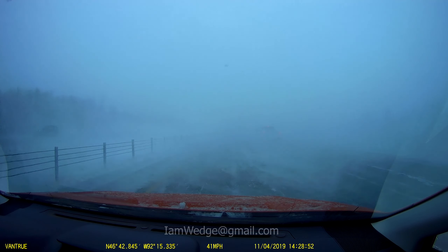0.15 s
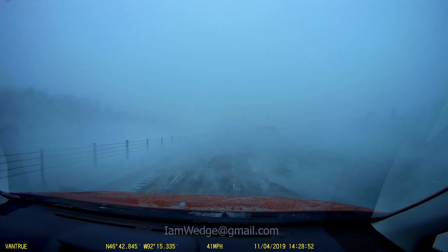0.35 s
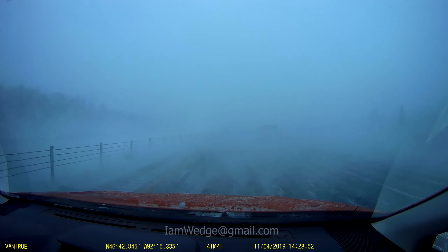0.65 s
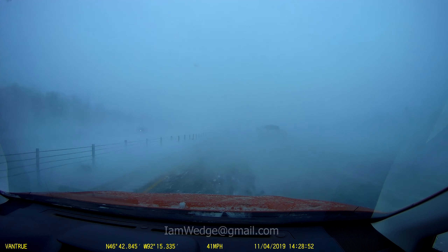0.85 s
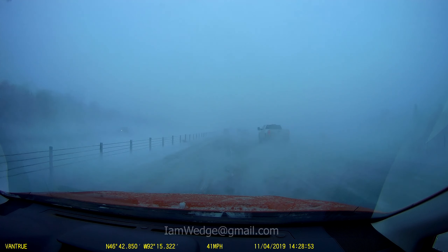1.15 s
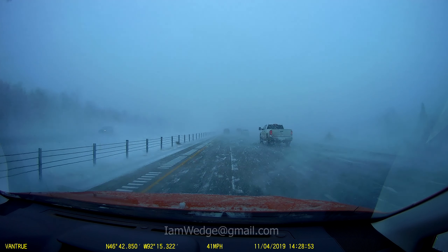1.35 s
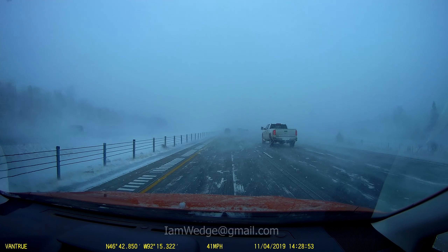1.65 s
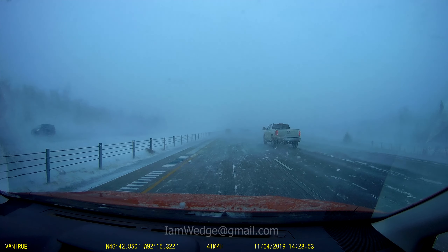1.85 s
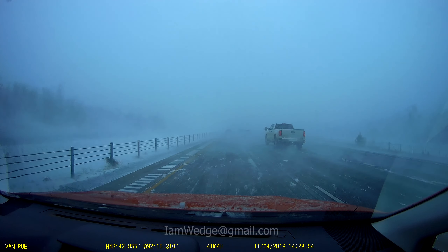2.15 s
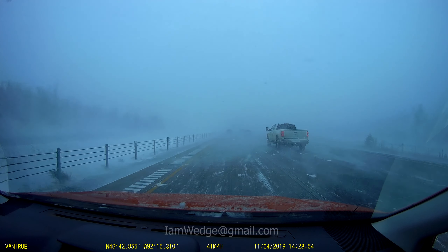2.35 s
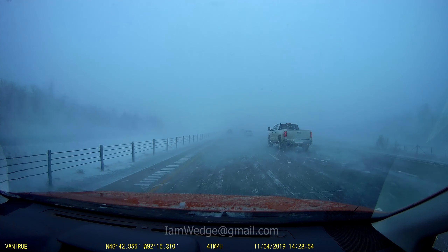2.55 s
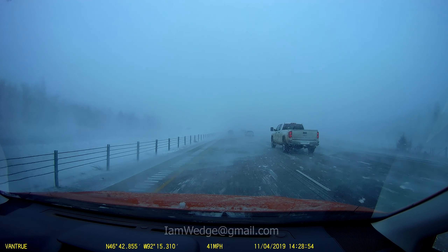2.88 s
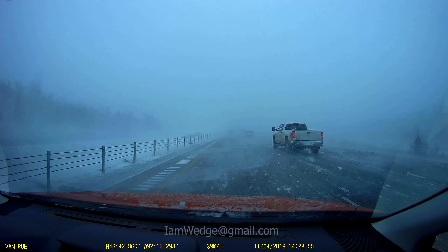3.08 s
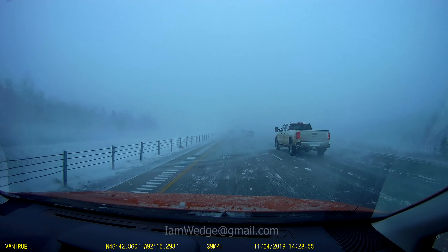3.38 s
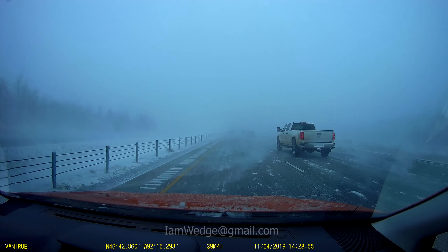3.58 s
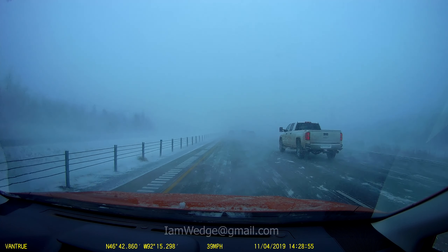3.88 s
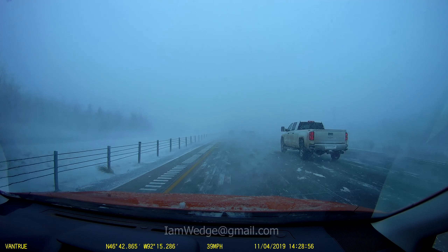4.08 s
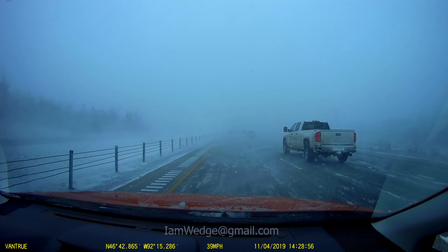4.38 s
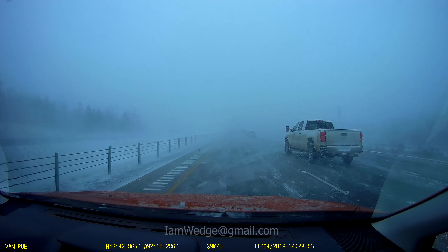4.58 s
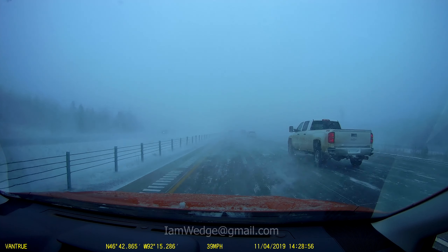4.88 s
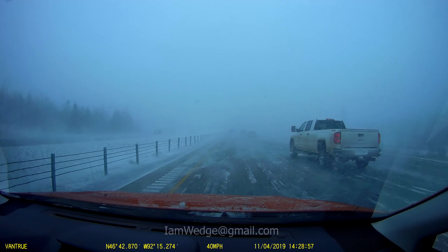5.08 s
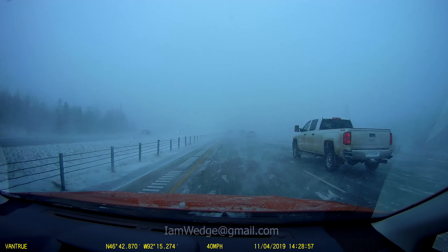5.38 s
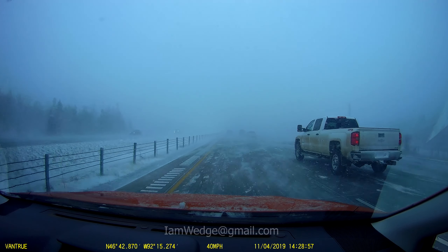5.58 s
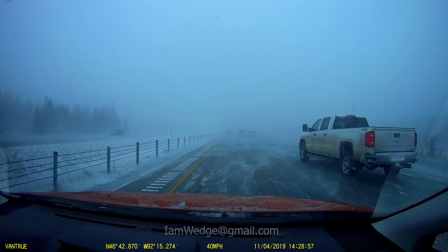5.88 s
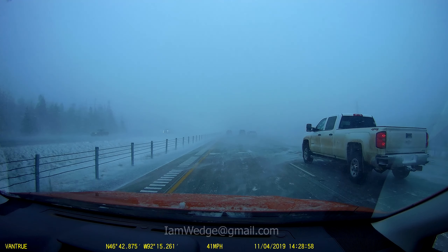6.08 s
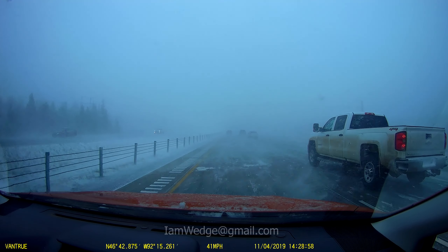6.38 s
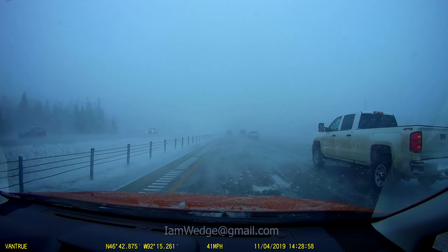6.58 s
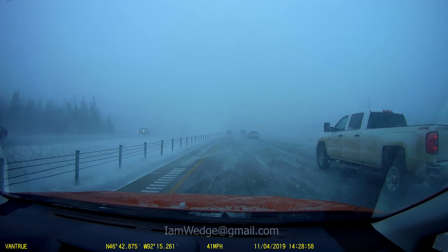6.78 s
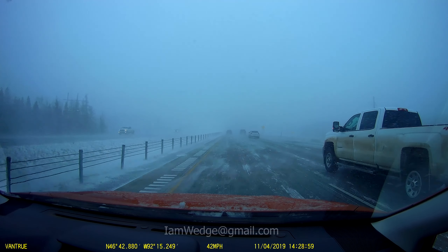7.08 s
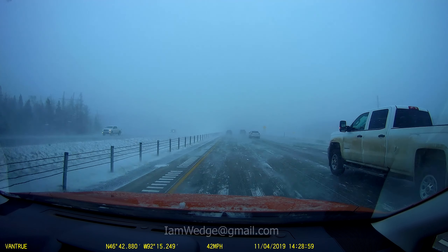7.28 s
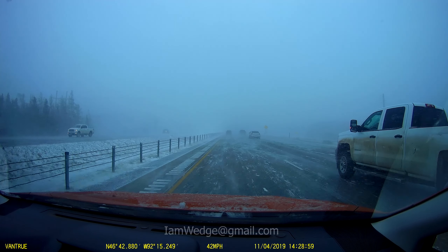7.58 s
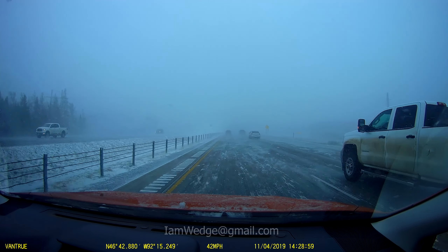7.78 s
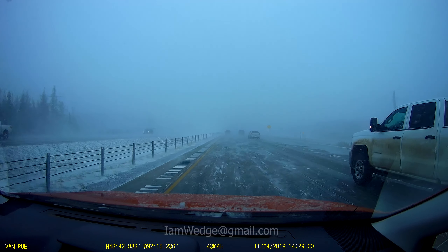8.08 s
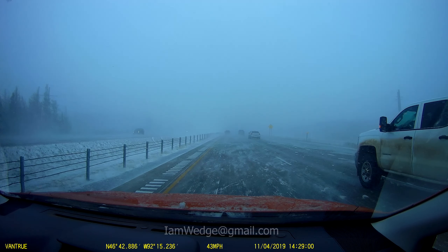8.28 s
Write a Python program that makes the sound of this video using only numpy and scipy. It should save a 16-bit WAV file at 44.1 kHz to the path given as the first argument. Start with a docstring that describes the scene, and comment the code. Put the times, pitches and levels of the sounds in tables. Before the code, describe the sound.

Gusty air buffets a car cabin, a boxy mid-low roar with airy hiss and faint thin whistling. Small crisp indicator clicks keep a regular tick-tock pulse from start to end. Below lies steady tyre rumble with a faint engine hum; dull bass bumps come around the middle and a stronger one near seven seconds. The microphone sits inside near the dashboard, in mono; a passing pickup makes no distinct sound.

```python
"""Inside a car on a snowy highway in a storm: gusts roar and hiss through a window gap and ring the cabin.
One airflow curve sets the levels of three shaped-noise layers (roar, rush, hiss); narrow noise whistles on top.
The indicator is a bank of decaying sines, a bright tick and a dull tock per flash.
Tyres and body drum low underneath: shaped noise with an engine hum, and sagging booms at road joints."""
import sys
import numpy as np
from scipy import signal
from scipy.fft import rfft, irfft, next_fast_len
from scipy.io import wavfile
from scipy.ndimage import uniform_filter1d, map_coordinates

SR = 44100
rng = np.random.default_rng(int(sys.argv[2]) if len(sys.argv) > 2 else 0)


def voltage_ratio(decibels):
    """Convert decibels (scalar or array-like) to amplitude ratios, 20 dB per decade."""
    exponent = np.asarray(decibels, float) / 20
    return 10 ** exponent


def pcm_store(signal):
    """Save signal as 16-bit PCM."""
    levels = np.round(np.clip(np.atleast_2d(signal), -1, 1) * 32767)
    wavfile.write(sys.argv[1], SR, levels.astype(np.int16).T)


N = 372204

# air through the gap between gusts; low lift = extra level of the low end:
# (time [s], hiss level [dB], low lift [dB])
AIRFLOW = [(0, -46, 1.5), (.13, -46, 0), (.19, -51, 2), (.3, -45, -0.5), (.62, -46, 1.5), (1.13, -45, 2.5),
           (1.6, -43, -0.5), (2.05, -46, 1), (2.6, -44.5, -2.5), (2.95, -46, -1), (3.15, -48, -0.5),
           (3.7, -49.5, 0), (4.5, -48.5, -1.5), (5.0, -50, 0.5), (5.3, -51, 0), (5.7, -49.5, 1.5),
           (6.45, -50.5, 0), (7.05, -48, 3), (7.45, -49.5, 1), (8.44, -51, -1)]
# gusts: (peak time [s], length [s], rise [dB])
GUSTS = [(.22, 0.054, 3.5), (.27, 0.16, 3.5), (.37, 0.11, 4.5), (.48, 0.12, 5.5), (.56, .06, 1.5),
         (.8, 0.082, 2), (.92, 0.13, 2), (1.02, 0.045, 0), (1.24, 0.073, 1.5), (1.33, 0.16, 7),
         (1.43, 0.12, 3), (1.5, 0.18, 2.5), (1.6, .1, 0.5), (1.72, 0.15, 2.5), (1.88, 0.16, 1.5),
         (2.26, 0.14, 3), (2.46, 0.15, 1), (2.65, .1, 0), (3.36, 0.086, 4.5), (3.54, 0.1, 3),
         (3.62, 0.036, 0), (3.89, 0.21, 3), (4.24, 0.34, 3), (4.54, 0.049, 2), (5.08, 0.084, 1.5),
         (5.8, 0.083, 3), (6.08, 0.19, 2.5), (6.62, 0.17, 0.5), (6.74, 0.14, 3.5), (6.86, 0.17, 2.5),
         (7.2, 0.13, 2.5), (7.31, 0.18, 2.5), (7.64, 0.13, 1.5), (8.1, 0.06, 0)]
# brief swells and dips of the low roar: (peak time [s], length [s], change [dB])
ROAR_SWELLS = [(.29, 0.047, 6.5), (.4, 0.037, 3.5), (.47, 0.1, 5), (.79, 0.038, 3.5), (.85, 0.26, 2),
               (.92, 0.064, 1.5), (1.17, 0.045, 0.5), (1.31, 0.047, -0.5), (1.46, 0.045, 3.5),
               (1.66, 0.059, 6.5), (1.83, 0.048, 2), (2.09, 0.039, 3), (2.25, 0.087, 2), (2.4, .05, 2),
               (2.5, .05, 2), (3.1, .05, -5.5), (3.05, .05, 1.5), (3.27, 0.07, 3), (3.59, 0.061, -1.5),
               (3.36, .05, -1), (3.81, .1, 0), (4.25, 0.03, 5.5), (4.42, 0.042, 0.5), (4.82, .06, 0.5),
               (5.1, 0.072, 4.5), (5.74, 0.036, 2), (6.04, 0.035, 3.5), (6.9, 0.17, 2), (7.06, .06, 0),
               (7.3, 0.15, 2), (7.66, .15, 0), (7.87, 0.035, 4), (8.32, 0.18, 2)]
# relative spectrum of the low wind layer: (frequency [Hz], density [dB per Hz])
ROAR_SPECTRUM = [(40, -120), (70, -18), (120, -6.5), (250, -2), (400, -6.5), (700, -14), (1200, -28.5),
                 (2500, -120)]
# relative spectrum of the middle wind layer: (frequency [Hz], density [dB per Hz])
RUSH_SPECTRUM = [(300, -120), (500, -7), (800, 0), (1200, 0), (2000, -11), (3000, -18.5), (5000, -31),
                 (8000, -120)]
# relative spectrum of the high wind layer: (frequency [Hz], density [dB per Hz])
HISS_SPECTRUM = [(1200, -120), (2000, -2.5), (3000, 0), (4500, -4.5), (7000, -9), (10000, -12.5),
                 (13000, -15), (16500, -19.5)]
# cabin and mount resonances and the hollows between: (frequency [Hz], 1/e half-width [Hz], gain [dB])
CABIN_MODES = [(133, 27.6, 4.5), (177.7, 32, 5), (206.7, 27, -4), (251, 56, 3), (292, 32, -3),
               (351.6, 33, 4), (387, 13.4, 4.5), (468, 44, -3.5), (561, 75, 6), (605, 68, -1), (708, 59, 3),
               (773, 43, -3), (820, 26, 0.5), (914, 14.7, -7), (944, 44, 3.5), (1063, 31, 4.5),
               (1215, 100, -2.5), (1480, 60, 0), (1917, 130, 3.5), (2330, 500, 0), (2790, 75, 4),
               (3060, 81, 5), (3280, 120, 0.5), (4740, 54, 3)]
# edge tones of the gap: (frequency [Hz], 1/e half-width [Hz], level re hiss at its loudest [dB])
EDGE_TONES = [(5372, 28, -19), (5675, 35, -21), (6065, 35, -24)]
# clicker modes: (frequency [Hz], tick level [dB], tock level [dB], t60 [s]); levels re CLICK_DB
CLICKER_MODES = [(2850, -8, -10, .012), (3150, -4, -20, .008), (3370, 4, -10, .012), (3400, -8, -22, .045),
                 (3600, -13, -3, .018), (6500, -15, -13, .03), (7120, -14, -25, .04),
                 (8300, -18, -14, .025), (9150, -17, -17, .03), (9350, -13, -19, .04),
                 (10200, -18, -16, .03), (10950, -16, -26, .03), (11450, -12.5, -22, .04),
                 (11800, -16, -26, .03), (12450, -11, -23, .04), (12720, -8, -18, .032),
                 (12800, -4, -18, .008), (13380, -9.5, -20, .035), (13800, -11, -24, .03),
                 (14050, -12, -21, .025), (14600, -12, -23, .025), (15000, -6, -21, .01)]
# dashboard echoes of a click: (delay [s], level [dB])
DASH_ECHOES = [(.0056, -10), (.0078, -10), (.0097, -13), (.013, -14)]
# relative spectrum of the floor drumming: (frequency [Hz], density [dB per Hz])
ROAD_SPECTRUM = [(3, -120), (8, -8), (22, -13), (33, 0), (47, -3.5), (70, -2), (100, -7.5), (200, -22.5),
                 (400, -120)]
# slow swells and dips of the low road rumble: (peak time [s], length [s], change [dB])
ROAD_SWELLS = [(0.02, .1, -2), (.33, .2, 4), (1.57, 0.53, 5), (1.93, .12, 4), (2.3, 0.28, 1.5),
               (3.48, 0.35, 4), (3.88, 0.13, 3), (4.25, 0.12, 2.5), (4.72, 0.21, 2), (5.17, .2, -0.5),
               (5.74, 0.051, 11), (5.3, 0.28, 2), (6.21, 0.33, 2), (6.7, 0.1, 8.5), (6.89, 0.14, 10.5),
               (7.6, 0.24, 2.5), (7.82, 0.13, 1)]
# wheels dropping over a joint: (start time [s], level before onset and decay [dB], starting pitch [Hz])
JOLTS = [(3.46, -17, 42), (3.85, -18, 60), (4.235, -14.5, 51.6), (6.715, -23, 38), (6.83, -9, 48),
         (6.93, -19, 36)]

MEAN_HISS_DB, RUSH_DB, ROAR_DB = -46, -35, -27  # layer levels at middling flow
RUSH_DB_PER_FLOW_DB, ROAR_DB_PER_FLOW_DB = 0.94, 0.77
RUSH_SWELL_SHARE = 0.27  # share of the roar's own level changes felt in the rush
TUMBLE_SCALE_DB, TUMBLE_KNOTS_PER_S = 0.5, 14  # random lurches of the roar
SWELL_FRONT_RATIO = 0.76  # rise time over fall time
ROAR_EVEN, RUSH_EVEN, ROAD_EVEN, EVEN_SPAN_S = 0.69, 0.52, 0.65, 0.069  # shares of chance swells removed
FIRST_TICK_S, FLASH_S, TOCK_LATE_S, CLICK_DB = .5678, .6843, .003, -38.5
ROAD_DB, ROAD_DB_PER_FLOW_DB, ROAD_WAVER_SCALE_DB = -31, 0.17, 0.1  # road level at middling flow
JOLT_RISE_TAU_S, JOLT_T60_S, JOLT_SAG_PER_S = 0.017, 0.22, 1.5  # sag: fraction of starting pitch


def unit(x):
    """x at rms 1."""
    return x / np.sqrt(np.mean(x ** 2) + 1e-20)


def along(points, hz):
    """Interpolates (Hz, value) points on a log frequency axis."""
    point_hz, values = np.transpose(points)
    return np.interp(np.log(hz + 1), np.log(point_hz + 1), values)


def curves(rows):
    """One value per sample for each column after the time, corners rounded as air has inertia."""
    times_s, *columns = np.transpose(rows)
    t = np.arange(N) / SR
    return [uniform_filter1d(np.interp(t, times_s, column), size=SR // 40) for column in columns]


def wobble(knots_per_s):
    """A smooth random curve through unit-variance knots."""
    knots = rng.standard_normal(int(N * knots_per_s / SR) + 4)
    return map_coordinates(knots, [np.arange(N) * knots_per_s / SR])


def swells(rows):
    """Sum of bell-shaped level changes in dB, steeper in front."""
    t = np.arange(N) / SR
    total_db = np.zeros(N)
    for peak_s, length_s, change_db in rows:
        span_s = length_s * np.where(t < peak_s, SWELL_FRONT_RATIO, 1)
        total_db += change_db * np.exp(-(2 * (t - peak_s) / span_s) ** 2)
    return total_db


def filtered(x, response):
    """x times a response of frequency, zero-padded."""
    m = next_fast_len(N + SR // 2)
    return irfft(rfft(x, m) * response(np.fft.rfftfreq(m, 1 / SR)), m)[:N]


def cabin_db(hz):
    """Cabin colour: each resonance or hollow lifts or lowers its neighbourhood by a bell."""
    return sum(db * np.exp(-((hz - centre) / width) ** 2) for centre, width, db in CABIN_MODES)


def turbulence(spectrum, patchy_db, bins=6):
    """Rms-1 noise in the cabin's colour; eddies are time-frequency patches of random gain."""
    z = signal.stft(rng.standard_normal(N), nperseg=512)[2]
    patches = uniform_filter1d(rng.standard_normal(z.shape), size=bins, axis=0)
    patches = uniform_filter1d(patches, size=9, axis=1)
    noise = signal.istft(z * voltage_ratio(patchy_db * unit(patches)), nperseg=512)[1][:N]
    return unit(filtered(noise, lambda hz: voltage_ratio(along(spectrum, hz) + cabin_db(hz))))


def evened(x, share):
    """Steadies a noise: divides out a share of its chance swells."""
    size = round(EVEN_SPAN_S * SR)
    power = uniform_filter1d(uniform_filter1d(x ** 2, size=size), size=size)
    power = np.abs(power) + 1e-6
    return unit(x / power ** (np.clip(share, 0, 1) / 2))


def wind(roar_db, rush_db, hiss_db):
    """Air tumbles past the gap; one fast flutter moves all layers, the treble most."""
    flutter_db = 0.12 * wobble(21) + 1.12 * wobble(35)  # before each layer's share
    roar = evened(turbulence(ROAR_SPECTRUM, patchy_db=1.0), ROAR_EVEN)
    rush = evened(turbulence(RUSH_SPECTRUM, patchy_db=0.94, bins=3), RUSH_EVEN)
    hiss = turbulence(HISS_SPECTRUM, patchy_db=1.5, bins=2)
    roar *= voltage_ratio(roar_db + 0.34 * flutter_db)
    rush *= voltage_ratio(rush_db + 0.51 * flutter_db)
    hiss *= voltage_ratio(hiss_db + 0.6 * flutter_db)
    return roar + rush + hiss


def whistles(hiss_db):
    """Edge tones of the gap: narrow-band noise that rises faster than the hiss in a gust."""
    level_db = hiss_db + 0.44 * (hiss_db - np.max(hiss_db))
    tones = np.zeros(N)
    for centre, width, db in EDGE_TONES:
        noise = rng.standard_normal(N)
        tones += voltage_ratio(db) * unit(filtered(noise, lambda hz: np.exp(-((hz - centre) / width) ** 2)))
    return voltage_ratio(level_db) * tones


def indicator():
    """Modes ring: bright tick as the lamp lights, dull tock as it goes out; the dashboard echoes and scatters."""
    t = np.arange(SR // 20) / SR
    hz, tick_db, tock_db, t60_s = np.transpose(CLICKER_MODES)[..., None]
    out = np.zeros(N + SR)
    for k, start_s in enumerate(np.arange(FIRST_TICK_S - FLASH_S / 2, N / SR, FLASH_S / 2)):
        is_tick = k % 2
        level_db = CLICK_DB + (tick_db if is_tick else tock_db) + rng.normal(0, 0.62, hz.shape)
        modes = voltage_ratio(level_db - 60 * t / t60_s) * np.sin(2 * np.pi * hz * t)
        ring = np.sum(modes, 0) * (1 - np.exp(-t / 0.00032))
        scatter = 0.031 * voltage_ratio(-60 * t / 0.11) * rng.standard_normal(len(t))
        for delay_s, db in DASH_ECHOES:
            scatter[round(delay_s * SR)] += voltage_ratio(db)
        echoes = signal.fftconvolve(ring[:SR // 600], scatter)[:len(t)]
        start = round((start_s + (0 if is_tick else TOCK_LATE_S)) * SR)
        out[start:][:len(t)] += ring + echoes
    return out[:N]


def jolts():
    """The body booms on its springs at each joint: a decaying sine, sagging in pitch."""
    out, t = np.zeros(N + SR), np.arange(SR // 2) / SR
    for start_s, db, hz in JOLTS:
        boom = np.sin(2 * np.pi * hz * (t - JOLT_SAG_PER_S * t ** 2 / 2))
        boom *= 1 - np.exp(-t / JOLT_RISE_TAU_S)
        out[round(start_s * SR):][:len(t)] += voltage_ratio(db - 60 * t / JOLT_T60_S) * boom
    return out[:N]


def road(level_db):
    """Tyres shake the floor pan, which drums low; the engine's firing order wavers inside the drumming."""
    hum_hz = 47 + 6 * wobble(5)
    hum = np.sqrt(2) * np.sin(2 * np.pi * np.cumsum(hum_hz) / SR)
    drumming = turbulence(ROAD_SPECTRUM, patchy_db=0.0) + 0.32 * hum
    return voltage_ratio(level_db) * evened(drumming, ROAD_EVEN)


def scene():
    """One airflow drives hiss, rush and roar, and slightly the road; all sources sum to mono."""
    steady_db, low_lift_db = curves(AIRFLOW)
    hiss_db = steady_db + swells(GUSTS)
    flow_db = hiss_db - MEAN_HISS_DB
    low_db = low_lift_db + swells(ROAR_SWELLS) + TUMBLE_SCALE_DB * wobble(TUMBLE_KNOTS_PER_S)
    roar_db = ROAR_DB + ROAR_DB_PER_FLOW_DB * flow_db + low_db
    rush_db = RUSH_DB + RUSH_DB_PER_FLOW_DB * flow_db + RUSH_SWELL_SHARE * low_db
    road_db = ROAD_DB + ROAD_DB_PER_FLOW_DB * (steady_db - MEAN_HISS_DB)  # steady flow only
    road_db += swells(ROAD_SWELLS) + ROAD_WAVER_SCALE_DB * wobble(9.4)
    air = wind(roar_db, rush_db, hiss_db) + whistles(hiss_db)
    return (air + indicator() + jolts() + road(road_db))[None]


def roll_off(x):
    """The treble ends steeply here."""
    return signal.sosfilt(signal.butter(12, 15690, fs=SR, output="sos"), x)


def record(dry):
    """Takes the mono mix as it stands."""
    return roll_off(dry)


dry = scene()
out = record(dry)
pcm_store(out)
```